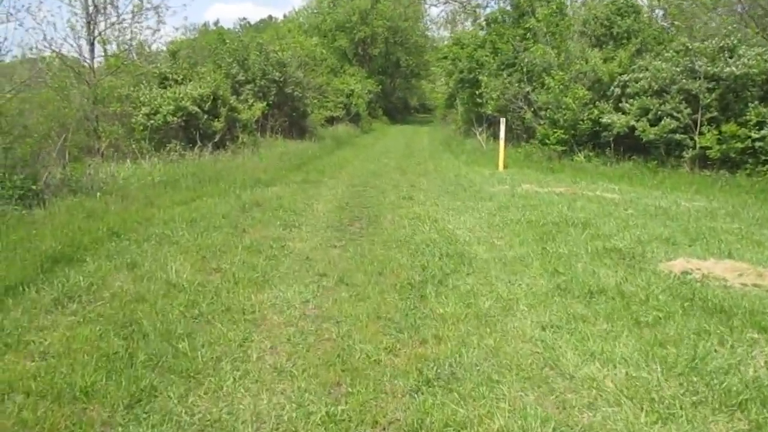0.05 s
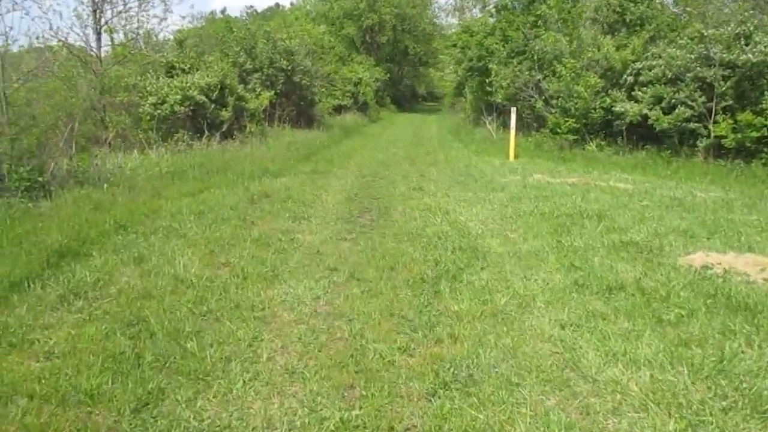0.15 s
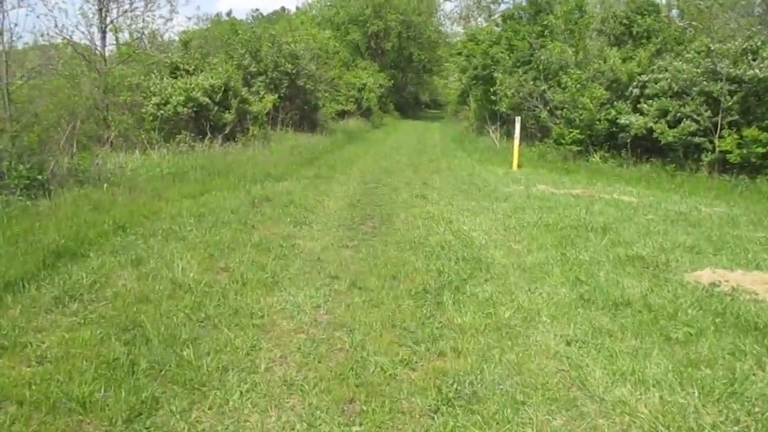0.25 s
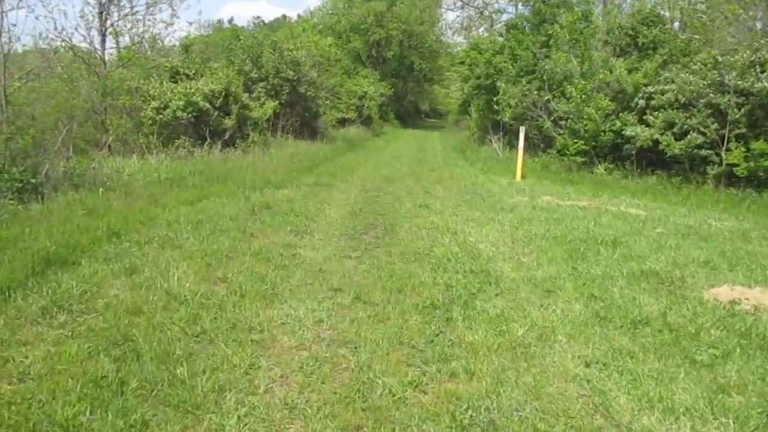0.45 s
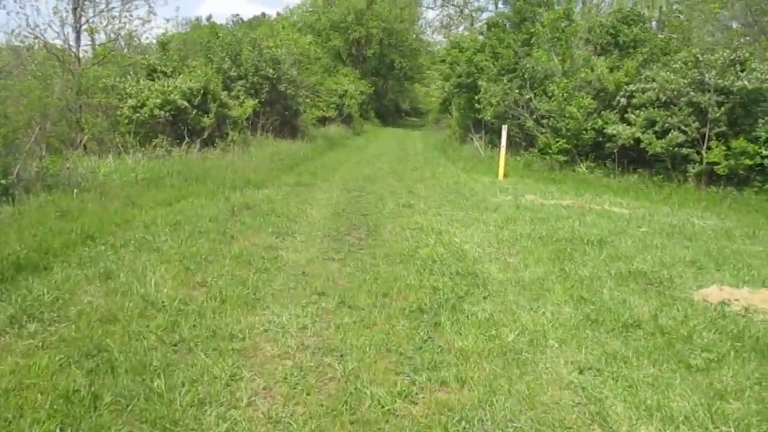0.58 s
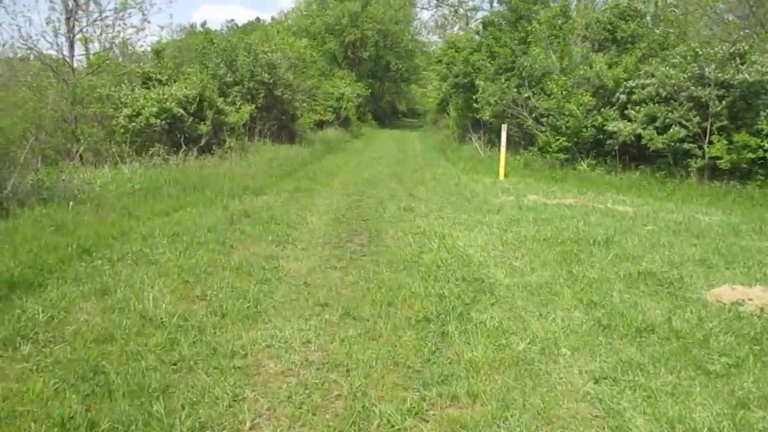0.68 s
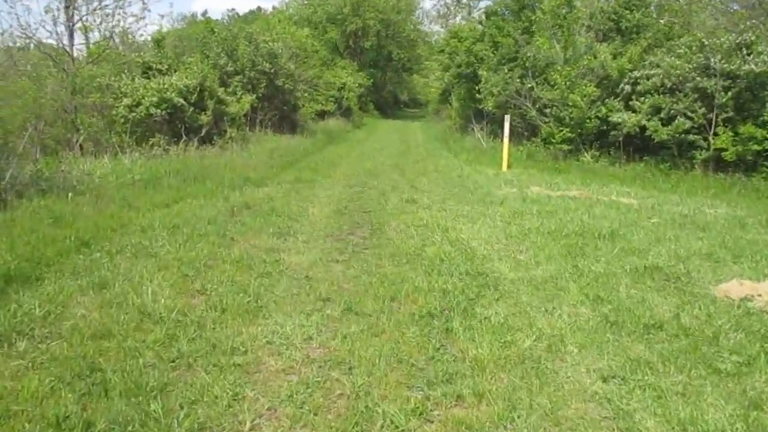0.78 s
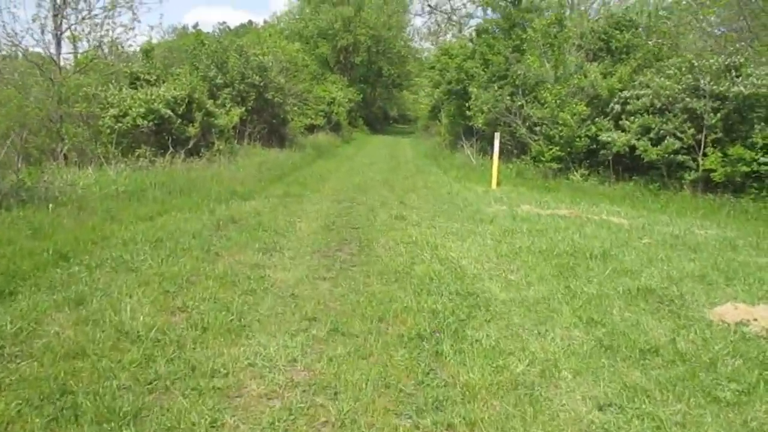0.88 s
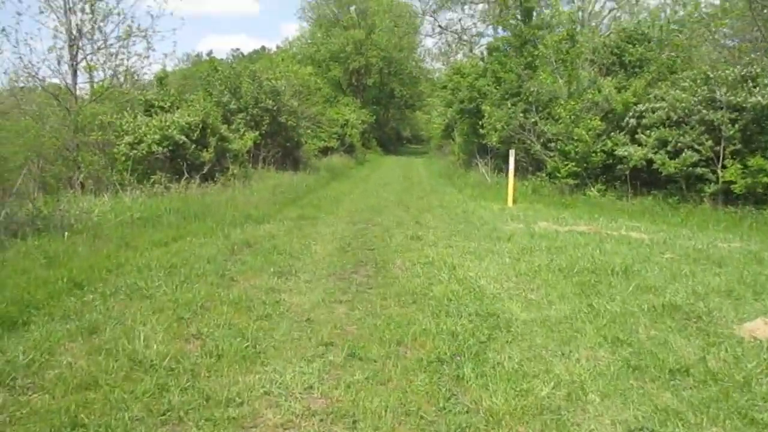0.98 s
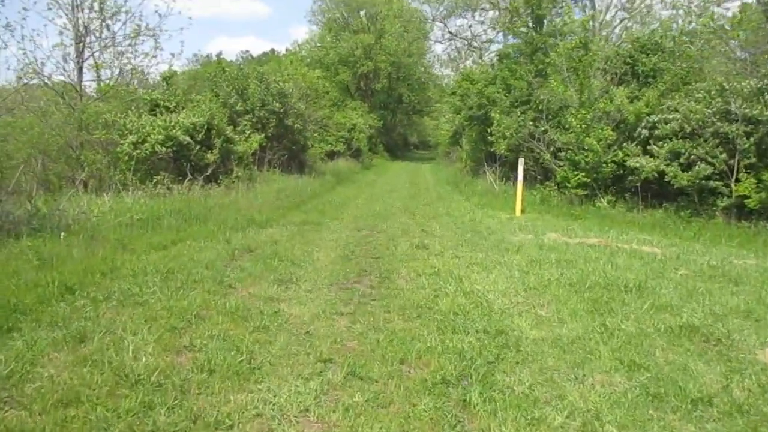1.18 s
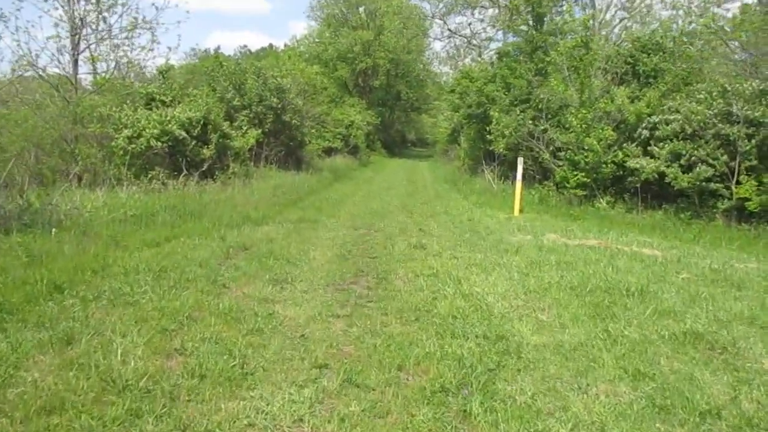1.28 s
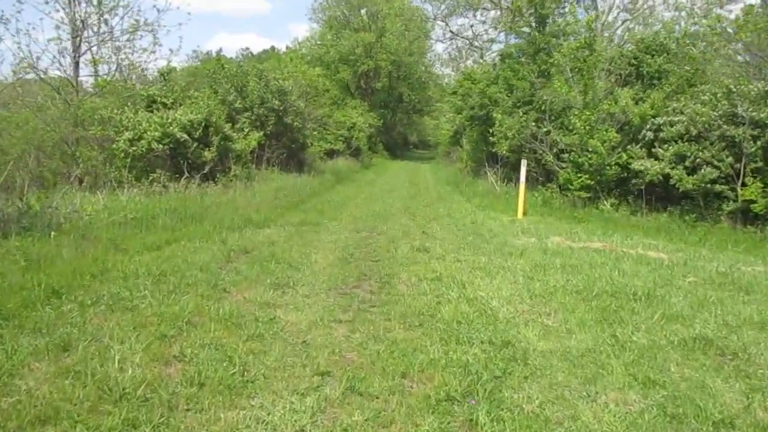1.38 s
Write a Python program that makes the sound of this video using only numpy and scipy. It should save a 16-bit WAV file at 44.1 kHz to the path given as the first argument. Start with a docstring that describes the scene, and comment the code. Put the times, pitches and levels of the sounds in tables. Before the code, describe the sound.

Footsteps crunch and swish through mown grass on an outdoor trail; a far bird chirps thinly, then a sharp snap hits close to the handheld microphone, followed by knocks and softer rustling.

```python
"""Footsteps in mown grass

Someone walks a grass trail with a hand-held camera; feet and legs swish, as coloured noise of tiny slips.
A hard part, probably on the strap, snaps against the camera (decaying sines that sag in pitch), overloads
the microphone and rattles on the case (struck modes and grit). The gain control ducks after the snap.
A far bird chirps in gliding sines over soft outdoor air, hiss and low buffets of filtered noise."""
import sys
import numpy as np
from scipy import signal
from scipy.fft import rfft, irfft
from scipy.io import wavfile
from scipy.ndimage import uniform_filter1d

SR = 44100
rng = np.random.default_rng(int(sys.argv[2]) if len(sys.argv) > 2 else 0)


def to_wav(sig):
    """Store sig (one row per channel, or 1-D mono) as 16-bit WAV at the path in sys.argv[1].

    Samples outside -1..1 are clipped; the rate is SR.
    """
    pcm = np.clip(np.atleast_2d(sig), -1, 1) * 32767
    pcm = np.round(pcm).astype(np.int16)
    wavfile.write(sys.argv[1], SR, pcm.T)  # frames by channels


N = 63945
T = np.arange(N) / SR  # time [s]


def amp(db):
    """Logarithmic level: decibels become a linear amplitude factor."""
    return 10 ** (np.asarray(db) / 20)


def unit(x):
    """Power normalisation: the signal is scaled to an rms of 1."""
    return x / np.sqrt(np.mean(x ** 2) + 1e-20)


def colour(x, points):
    """Spectral shaping: gains interpolated over log frequency weight the spectrum; the rms becomes 1."""
    hz, db = np.transpose(points)
    bin_hz = np.fft.rfftfreq(N, 1 / SR)
    gain_db = np.interp(np.log(bin_hz + 1), np.log(hz), db)
    return unit(irfft(rfft(x) * amp(gain_db), N))


def swell(peak, rise, fall, db):
    """Gaussian envelope: separate widths [s] before and after the peak."""
    width = np.where(T < peak, rise, fall)
    return amp(db) * np.exp(-.5 * ((T - peak) / width) ** 2)


def swells(rows):
    """Incoherent addition: the powers of several envelopes add."""
    return np.sqrt(sum(swell(*row) ** 2 for row in rows))


def air():
    """Broadband noise: a drifting, fluttering outdoor wash, steady fine hiss and low microphone buffets."""
    # relative spectra of the wash, hiss and buffets: (frequency [Hz], level [dB])
    air_colour = [(20, -5), (45, -8.5), (90, 2), (140, 1), (200, -2.5), (330, -7), (550, -7.5), (850, -4.5),
                  (1400, -10), (2100, -12), (3000, -21.5), (4500, -33), (8000, -35), (16000, -47)]
    hiss_colour = [(1000, -2.5), (4000, 1), (8000, -5.5), (12000, -10.5), (15700, -19), (16800, -49)]
    buffet_colour = [(15, -13), (42, 3.5), (80, -0.5), (200, -34), (1000, -75)]
    # slow drift of the wash: (time [s], level change [dB])
    air_drift = [(0, -0.5), (.3, 3), (.5, 1.5), (.75, 0), (1, -2), (1.2, -1), (1.45, -3)]
    # low buffets on the microphone: (peak time [s], rise width [s], fall width [s], level [dB])
    buffets = [(.33, 0.025, 0.018, -63), (.66, 0.0045, 0.017, -39.5), (1.257, .012, 0.012, -44),
               (1.36, 0.048, 0.025, -50)]
    air_db, flutter_rms_db, hiss_db = -46, 2, -61

    flutter = colour(rng.standard_normal(N), [(3, -10), (40, -4), (120, -40), (1000, -100)])
    drift_db = np.interp(T, *np.transpose(air_drift))
    wash = colour(rng.standard_normal(N), air_colour)
    wash *= amp(air_db + drift_db + flutter_rms_db * flutter)
    hiss = amp(hiss_db) * colour(rng.standard_normal(N), hiss_colour)
    buffeting = colour(rng.standard_normal(N), buffet_colour) * swells(buffets)
    return wash + hiss + buffeting


def blades(per_s=3500, spread_db=4.5, smooth=.63):
    """Stick-slip friction: random slips of uneven size over smooth noise, which has a share of the power."""
    size = amp(spread_db * np.minimum(rng.exponential(1, N), 3))
    sign = rng.choice([-1., 1.], N)
    slips = size * sign * (rng.random(N) < per_s / SR)
    return np.sqrt(1 - smooth) * unit(slips) + np.sqrt(smooth) * rng.standard_normal(N)


def walking():
    """Frictional noise: dull footfalls, bright blade swishes and softer rubbing differ in spectrum and swell."""
    # feet pressing into the grass, each dull crunch with its own pitch:
    # (peak time [s], rise width [s], fall width [s], level [dB], spectrum frequency factor [1])
    steps = [(.02, 0.037, .03, -48, 0.91), (.125, 0.049, 0.048, -44.5, 1.02),
             (.29, 0.062, 0.026, -39, 1.72), (0.326, 0.018, .032, -32, 0.94),
             (0.391, 0.018, 0.022, -38.5, 0.99), (.49, .06, 0.037, -48, 1.05),
             (.66, 0.038, 0.035, -40.5, 1.07), (.86, 0.038, 0.049, -42, 1.22),
             (1.02, 0.033, 0.031, -53, 0.81), (1.27, 0.044, 0.057, -51.5, 1.96),
             (1.435, 0.037, .05, -43, 1.29)]
    # blades whipping over a shoe: (peak time [s], rise width [s], fall width [s], level [dB],
    # sizzle boost before the rms is set [dB])
    swishes = [(.221, 0.0038, 0.029, -38.5, 10), (.252, 0.017, 0.016, -46, 11), (.3, 0.058, 0.045, -49, -3),
               (.393, 0.025, 0.02, -37, -4.5), (.48, 0.062, 0.073, -54, -9.5),
               (0.597, 0.019, 0.028, -47, -10), (0.66, 0.013, 0.0095, -38, -10)]
    # softer rubbing during the later footfalls:
    # (peak time [s], rise width [s], fall width [s], level [dB])
    rubs = [(.685, 0.0071, 0.024, -44), (.735, .014, 0.014, -38), (.81, 0.062, 0.063, -48.5),
            (.9, 0.066, 0.1, -50), (1.02, 0.03, 0.024, -41), (1.09, 0.0087, 0.027, -47.5),
            (1.135, 0.038, 0.014, -46)]
    # relative spectra, that of the steps before its frequency factor: (frequency [Hz], level [dB])
    step_colour = [(60, -18), (200, -10), (380, -5.5), (560, 1.5), (800, -3), (1200, -8.5), (1700, -15),
                   (2600, -20.5), (5000, -27.5), (16000, -41)]
    swish_colour = [(500, -52), (2000, -1), (3000, -7.5), (4000, 5), (5000, -2), (6200, -2), (7300, -5),
                    (9500, 0), (12000, -7), (15500, -12), (17000, -45)]
    rub_colour = [(400, -5.5), (1100, 0.5), (1900, -2), (2400, -10), (3000, 3.5), (3500, 1.5), (4100, -11),
                  (4650, -10.5), (5100, -4.5), (5800, -11), (6500, -6), (7700, -16), (9000, -11.5),
                  (9900, -10.5), (10700, -15.5), (15500, -24), (17000, -50)]
    sizzle_hz, sizzle_width_hz = 10200, 2400

    out = colour(blades(), rub_colour) * swells(rubs)
    for peak, rise, fall, db, pitch in steps:
        crunch = blades(per_s=1400, spread_db=3.2, smooth=.35)
        shifted_colour = np.multiply(step_colour, [pitch, 1])
        out += colour(crunch, shifted_colour) * swell(peak, rise, fall, db)
    bin_hz = np.fft.rfftfreq(N, 1 / SR)
    sizzle = np.exp(-.5 * ((bin_hz - sizzle_hz) / sizzle_width_hz) ** 2)
    for peak, rise, fall, db, sizzle_db in swishes:
        sizzling = irfft(rfft(blades()) * amp(sizzle_db * sizzle), N)
        out += colour(sizzling, swish_colour) * swell(peak, rise, fall, db)
    return out


def bird():
    """Frequency modulation: phase accumulates a falling frequency, giving thin whistles that slide down."""
    # chirps of a far bird: (start [s], length [s], level at mid-chirp [dB], fall [Hz])
    chirps = [(.022, .042, -57, 1000), (.092, .04, -55, 850), (0.164, .034, -56, 600),
              (.228, .035, -53, 600), (.515, .025, -55, 350)]
    start_hz, bend, fade_db = 4170, 1.6, -5  # bend is the exponent of the glide
    out = np.zeros(N)
    for start, length, db, fall_hz in chirps:
        progress = np.clip((T - start) / length, 0, 1)
        arch = np.sqrt(4 * progress * (1 - progress))
        cycles = np.cumsum(start_hz - fall_hz * progress ** bend) / SR
        out += amp(db + fade_db * (progress - .5)) * arch * np.sin(2 * np.pi * cycles)
    return out


def knocks():
    """Modal excitation: each knock rings damped case modes, weighted by band, with a brief scrape."""
    # knocks on the case: (start [s], contact time constant [s], mode frequency factor [1],
    # mode decay factor [1], bass level [dB], middle level [dB], treble level, also of the grit [dB])
    knock_rows = [(0.2161, 0.00015, 0.71, 0.53, -22, -19, -12.5),
                  (.3645, 0.00036, 0.79, 0.62, -14, -28, -43), (.5062, 0.00043, 1.25, 1, -43, -29.5, -46),
                  (0.62, 0.00042, 0.972, 0.81, -7.5, -16.5, -4.5),
                  (0.635, .001, 1.75, 0.61, -19.5, -25, -39), (0.638, 0.00038, 1.09, 0.79, -28, -23, -28),
                  (0.6436, .0002, 0.87, 0.45, -54, -36, -42), (.6502, 0.00087, 1, 1, -6.5, -5, -9),
                  (0.6565, .0005, 1.1, 0.4, -39, -26, -16), (0.664, 0.00039, 1, 0.62, -37, -19, -22),
                  (0.68, 0.0018, 0.99, 1, -19.5, -36, -38), (0.6875, 0.00035, 1.075, 0.88, -48, -25.5, -20),
                  (0.7433, 0.00044, 0.98, 0.71, -33.5, -24, -38),
                  (.792, 0.00046, 0.82, 0.83, -45, -36, -33), (.9468, 0.00034, 1.3, 0.66, -23.5, -42, -52),
                  (1.0866, 0.00018, 1.16, 0.75, -30, -31, -52), (1.202, 0.00062, 0.98, 1, -43, -30, -50),
                  (1.278, 0.00043, 1.48, 0.66, -34, -45, -59)]
    # centres of the bass, middle and treble weights: (frequency [Hz], ...)
    bands_hz = (1150, 1800, 7500)
    # case modes before each knock's factors and weights: (frequency [Hz], level [dB], 60 dB decay [s])
    case_modes = [(250, -12.5, 0.018), (356, -11.5, 0.023), (689, -4.5, .024), (957, -6, 0.017),
                  (1197, -4.5, 0.0092), (1884, -4, 0.0091), (2755, 1, 0.0089), (3310, -5.5, 0.0073),
                  (4290, -2.5, 0.0044), (4970, -10.5, 0.0072), (6460, -1, 0.0054), (7900, -6.5, 0.0044),
                  (9440, 0.5, 0.0029), (11700, -6.5, 0.0042), (14200, -2, .002)]
    # relative spectrum of the scrape: (frequency [Hz], level [dB])
    grit_colour = [(1000, -10), (3500, 5), (5500, 0), (7000, -2), (11000, 3.5), (15500, -12), (17000, -40)]
    grit_db, grit_t60 = -9.5, .0082  # dB relative to the treble level, s

    out = np.zeros(N)
    grit = colour(rng.standard_normal(N), grit_colour)
    for start, contact, pitch, ring, bass_db, middle_db, treble_db in knock_rows:
        t = np.maximum(T - start, 0)
        knock = grit * amp(treble_db + grit_db - 60 * np.minimum(t / grit_t60, 10))
        for k, (hz, db, t60) in enumerate(case_modes):
            force_db = np.interp(np.log(hz), np.log(bands_hz), [bass_db, middle_db, treble_db])
            decay_db = -60 * np.minimum(t / (t60 * ring), 10)
            polarity = (-1) ** k
            knock += polarity * amp(db + force_db + decay_db) * np.sin(2 * np.pi * hz * pitch * t)
        out += knock * (1 - np.exp(-t / contact))
    return out


def snap():
    """Heavily damped impact: about a millisecond of ringing sags in pitch, with a short noise tail."""
    # ringing modes before the common gain: (starting frequency [Hz], level [dB], Gaussian decay width [s])
    snap_modes = [(3600, -0.5, 0.00052), (4840, 4, 0.00036), (5510, -1.5, 0.0005), (7286, 1.9, 0.00048),
                  (9300, -0.4, 0.00025)]
    # relative spectrum of the tail: (frequency [Hz], level [dB])
    tail_colour = [(200, -16), (700, -12), (1300, -3), (3500, -1), (6000, -13), (10000, -5), (16000, -34)]
    start_s, rise_s, ring_db = .53823, .00024, 3.5
    tail_db, tail_t60 = -15, .0094  # dB, s
    sag_share, sag_s = .54, .0004  # final fractional drop of the frequency, time scale in s

    t = np.maximum(T - start_s, 0)
    tail = colour(rng.standard_normal(N), tail_colour) * amp(tail_db - 60 * t / tail_t60)
    sag = 1 - np.exp(-(t / sag_s) ** 4)
    sagged_t = t - sag_share * np.cumsum(sag) / SR  # slowed time lowers every mode alike
    ring = np.zeros(N)
    for hz, db, width in snap_modes:
        ring += amp(db) * np.sin(2 * np.pi * hz * sagged_t) * np.exp(-.5 * (t / width) ** 2)
    onset = np.minimum(t / rise_s, 1)
    return onset * (tail - amp(ring_db) * ring)


def scene():
    """Superposition: the pressures of all sources add at the one microphone."""
    return (air() + walking() + bird() + knocks() + snap())[None]


def record(dry):
    """Dynamic compression: gain ducks just after a peak and recovers; clipping and low-pass filters follow."""
    limit_db, slope = -16, .87  # threshold, dB of ducking per dB above it
    attack_s, recover_s, lag_s = .001, .13, .0017
    soft_hz, edge_hz = 15400, 16957

    x = np.clip(dry[0], -1, 1)
    power = abs(uniform_filter1d(x ** 2, size=44))  # mean over about 1 ms
    level_db = 10 * np.log10(power + 1e-12)
    recovery = np.exp(-T / recover_s)
    # peak hold with an exponential return of the ducking depth
    wanted_db = slope * np.maximum(level_db - limit_db, 0)
    duck_db = np.maximum.accumulate(wanted_db / recovery) * recovery
    glide = np.exp(-1 / (attack_s * SR))
    duck_db = signal.lfilter([1 - glide], [1, -glide], duck_db)
    lagged_duck_db = np.interp(T - lag_s, T, duck_db)
    out = np.clip(dry[0] * amp(-lagged_duck_db), -1, 1)
    out = signal.lfilter(*signal.butter(2, soft_hz, fs=SR), out)
    band_limit = signal.firwin(255, edge_hz, window=("kaiser", 8), fs=SR)
    return signal.oaconvolve(out, band_limit, "same")[None]


dry = scene()
out = record(dry)
to_wav(out)
```